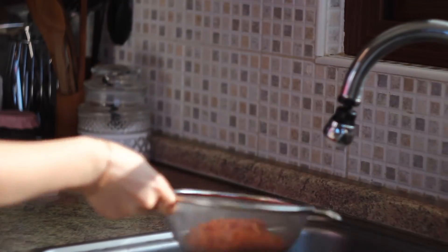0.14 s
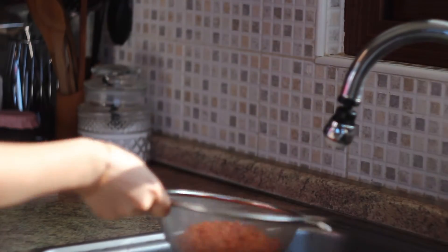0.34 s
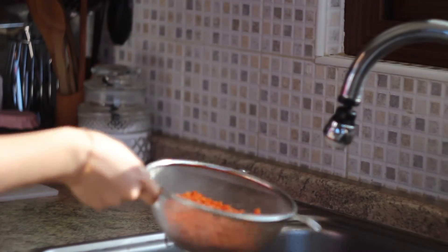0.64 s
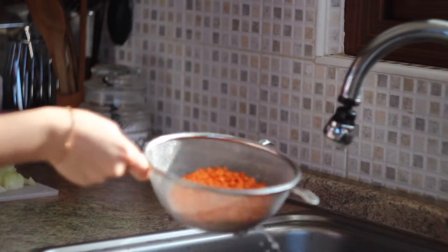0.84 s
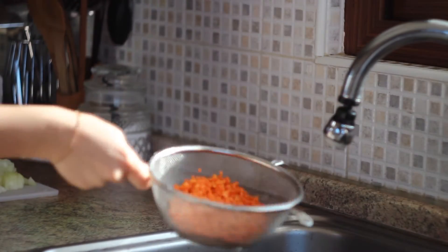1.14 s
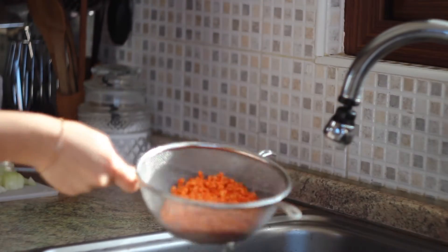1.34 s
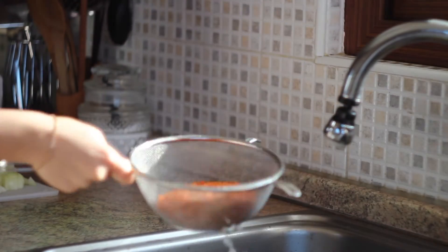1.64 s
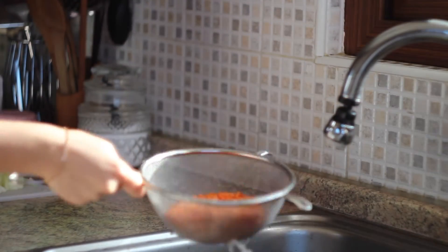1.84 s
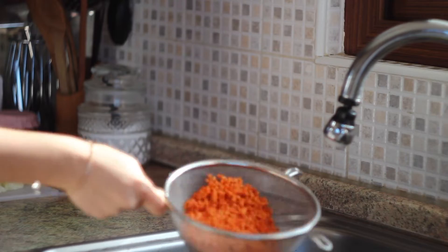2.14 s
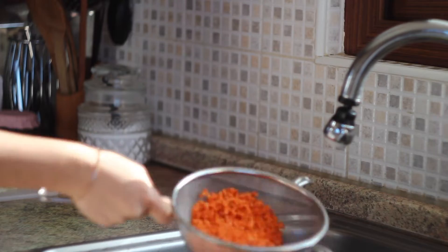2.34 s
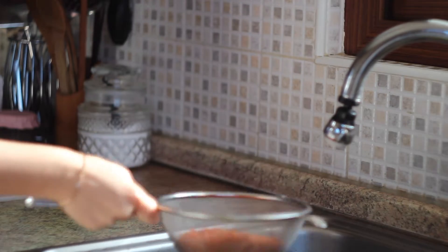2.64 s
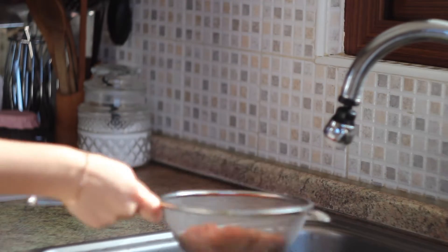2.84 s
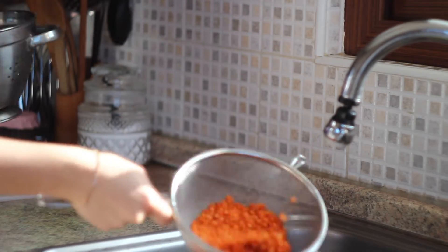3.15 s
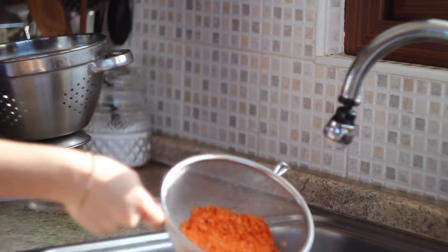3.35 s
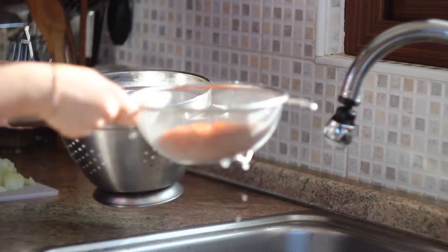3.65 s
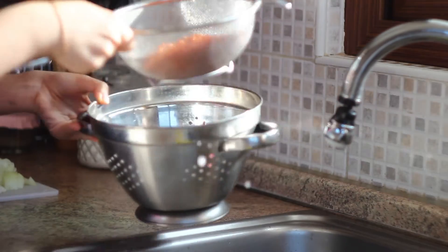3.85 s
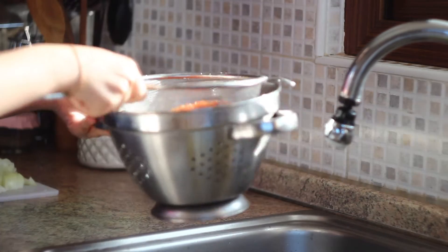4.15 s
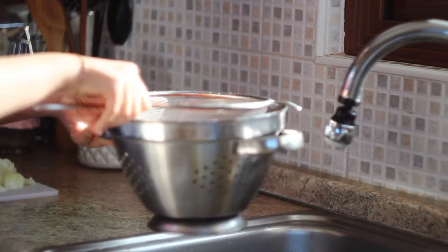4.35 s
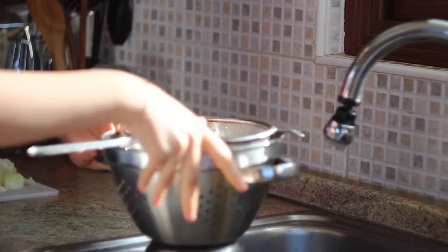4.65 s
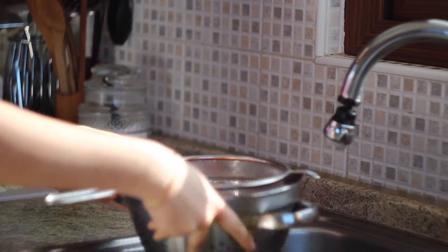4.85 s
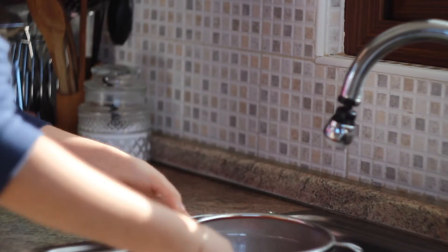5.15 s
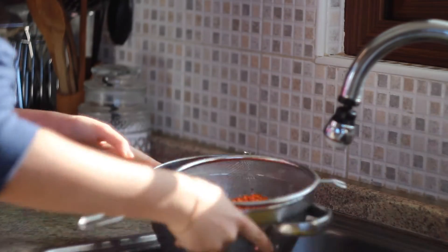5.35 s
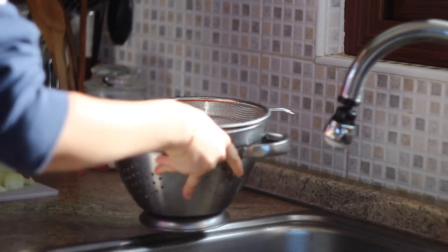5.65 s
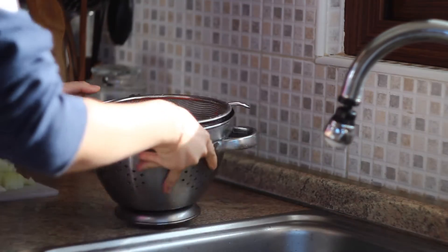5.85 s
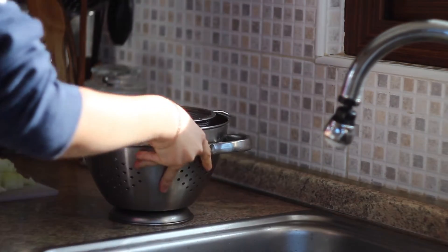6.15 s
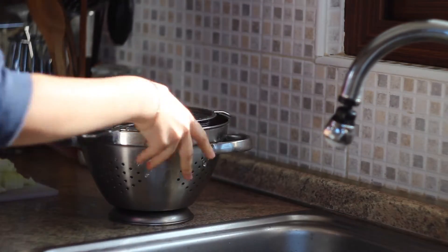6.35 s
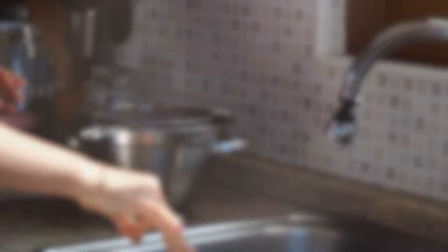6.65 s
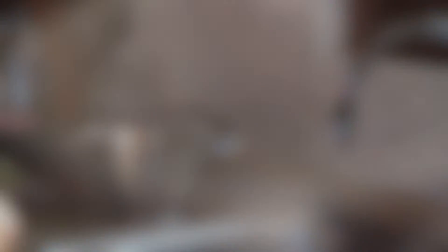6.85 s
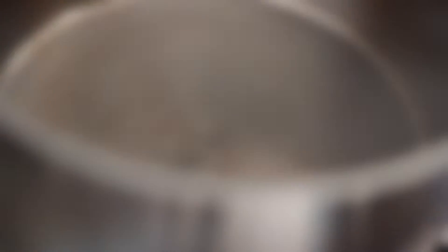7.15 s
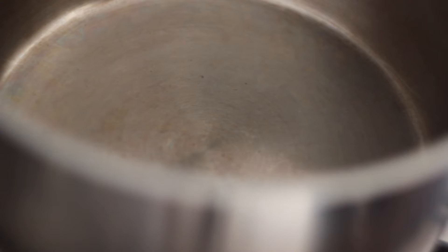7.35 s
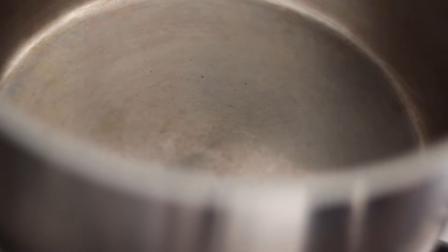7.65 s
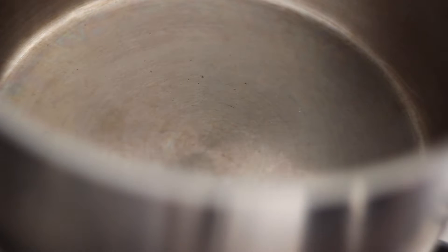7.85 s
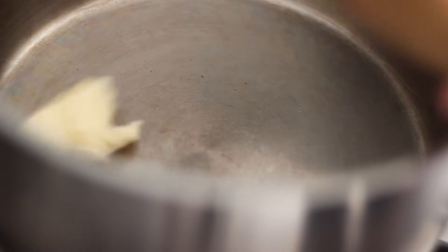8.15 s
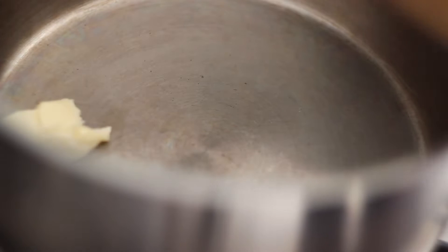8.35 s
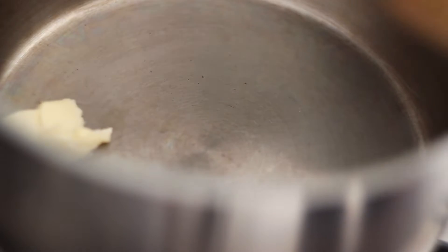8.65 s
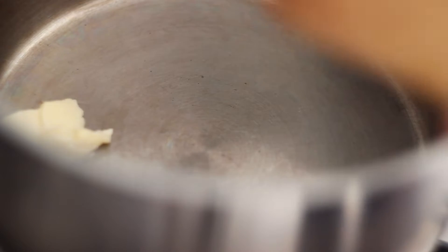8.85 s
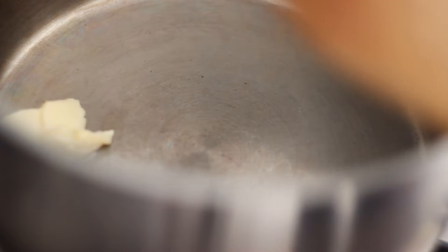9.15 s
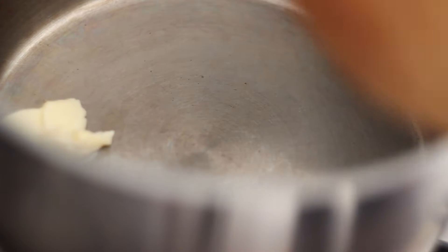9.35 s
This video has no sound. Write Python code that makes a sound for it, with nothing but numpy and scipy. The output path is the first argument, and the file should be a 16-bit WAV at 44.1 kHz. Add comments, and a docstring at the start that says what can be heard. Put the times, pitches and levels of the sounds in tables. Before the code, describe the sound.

Close to the microphone in a tiled kitchen with a steady ventilation hum, a wire strainer of wet lentils is tossed several times and shaken rapidly. It drops into a steel colander with bright, ringing clanks. The steel rubs as it is lifted, then lands ringing on the counter. The room turns quieter, and a few utensil scrapes and clicks lead to a soft bump on a pot.

```python
"""Wet lentils swish and patter close by, tossed and then shaken dry in a wire strainer over a kitchen sink.
The strainer clatters into a steel colander, wires and rim ringing; steel rubs on steel as the colander
is lifted, and its foot rings on the stone counter. The humming, tiled room then fades into a quieter
one, where utensils slide and click and a pot is bumped. All is heard as from one microphone near
the work, with the echo of the tiles well under the direct sound."""
import sys
import numpy as np
from scipy import signal
from scipy.fft import rfft, irfft, next_fast_len
from scipy.io import wavfile
from scipy.ndimage import uniform_filter1d, minimum_filter1d

SR = 44100
rng = np.random.default_rng(int(sys.argv[2]) if len(sys.argv) > 2 else 0)


def pcm_store(signal):
    """Save signal as 16-bit PCM."""
    levels = np.round(np.clip(np.atleast_2d(signal), -1, 1) * 32767)
    wavfile.write(sys.argv[1], SR, levels.astype(np.int16).T)


N = 418509
AGE = np.arange(round(.65 * SR)) / SR  # time within one event [s]
LEAD_S = .22  # from the start of a swell to its crest

# the strainer's crowd of short-lived wire modes: (frequency [Hz], density [dB])
WIRE_SPECTRUM = [(120, -44.5), (200, -38), (345, -18), (462, -28), (525, -16), (842, -12.5), (1230, -8),
                 (1540, -8), (2470, -7.5), (3360, -3.5), (3680, -7), (6130, -8.5), (15500, -17.5)]
# colander on the counter: (time [s], ring [dB], clatter over ring [dB], thump [dB])
LANDINGS = [(6.001, -22.5, 2, -39), (6.035, -30.5, 2, -50), (6.255, -66, 1, -43.5)]


def lentils(rate=9000, settle_t60=0.36, mesh_db=-9):
    """Each stroke throws wet seeds against the ringing mesh; they patter out as the heap settles."""
    # wet seeds on wire: (frequency [Hz], density [dB])
    seed_spectrum = [(530, -37), (900, -12), (1350, -2.5), (1950, -1), (2450, 0.5), (3150, -1), (4300, -3),
                     (6200, -5), (7300, -4), (9700, -15), (14300, -21.5), (15500, -34)]
    # resonances of the mesh: (frequency [Hz], level [dB])
    mesh_modes = [(1950, -8), (2650, -8), (3190, 0), (3850, -8)]
    patter, mesh_power = np.zeros(N), np.zeros(N)
    for s, db, rise, tilt_db in strokes():
        seeds = unit(grains(rate)) + amp(-7.5) * unit(grains(rate=280))  # a few wet ticks stand out
        toss = amp(db - 0.5) * swell(rise, settle_t60)
        add(patter, s - LEAD_S, toss * coloured(seeds, seed_spectrum, tilt_db, knee_hz=2300))
        push = toss * amp(mesh_db - 2 * tilt_db)  # a heap that slides dully rings the mesh most
        add(mesh_power, s - LEAD_S, push ** 2)
    mesh = resonate(rng.standard_normal(N), mesh_modes, width_hz=200)
    return patter + np.sqrt(mesh_power) * mesh


def strokes(land_rise_s=0.019, back_delay_s=.131, back_rise_s=0.028,
            shake_start_s=1.5, stroke_s=.103, stroke_rise_s=0.037, count=20):
    """Tosses, then side-to-side shaking, as (crest [s], level [dB], rise [s], tilt [dB/octave])."""
    # tosses of the heap: (landing crest [s], landing [dB], slide back [dB])
    tosses = [(.02, -44.5, -47), (.17, -44, -38.5), (.396, -33.5, -44.5), (.609, -35.5, -42.5),
              (.841, -37, -49.5), (1.065, -37, -54), (1.29, -45.5, -58)]
    # effort of the shaking: (time [s], level [dB], tilt [dB/octave])
    effort = [(1.5, -47.5, -1), (1.78, -40, -1), (2.09, -49.5, -1.5), (2.22, -40, -3), (2.53, -38, -.5),
              (2.72, -44.5, 1.5), (2.84, -40.5, -1), (3.24, -41.5, 2.5), (3.46, -50.5, 3)]
    moves = []
    for s, land_db, back_db in tosses:
        land_tilt_db = 3.5 + .15 * (land_db + 39)  # the harder the heap lands, the brighter
        moves.append((s, land_db, land_rise_s, land_tilt_db))
        moves.append((s + back_delay_s, back_db, back_rise_s, -1))  # it slides back dully
    when, level_db, tilt_db = np.transpose(effort)
    for s in shake_start_s + stroke_s * np.arange(count):
        moves.append((s, np.interp(s, when, level_db), stroke_rise_s, np.interp(s, when, tilt_db)))
    return moves


def strainer(rim_t60=0.31, frame_t60=0.19, crack_t60=0.0096, ring_db=-4):
    """Each clank is a crack, a clash of quickly dying wire modes and the ring of rim and frame."""
    # strainer against colander:
    # (time [s], level [dB], tilt [dB/octave], hardness [0-1], place [0 = frame, 1 = rim])
    clanks = [(4.236, -39, 0, 0.6, .2), (4.241, -22, -1.2, 0.06, .2), (4.268, -25.5, 1, .6, .1),
              (4.314, -17.5, 4.5, 0.3, 0.15), (4.317, -33, -16, 0.1, 0.22), (4.408, -22.5, -1, 0.25, 0.29),
              (4.52, -22.5, 18, 0.9, 0.26), (4.525, -10.5, 4.5, 0.83, 0.87), (4.806, -43.5, -2.5, 0.03, 1),
              (5.262, -29.5, -1, 0.8, .55), (5.367, -31, -4.5, .2, 0.13), (5.912, -34, 4.5, 0.1, .2),
              (6.187, -35.5, 1, 0.43, .1)]
    # lasting modes of the steel rim: (frequency [Hz], level [dB])
    rim_modes = [(831, -14.8), (1528, -13.5), (1812, -14.6), (2182, -14.0), (3028, -10.2), (3080, -8.5),
                 (3230, -7.8), (3314, 0.0), (3410, -3.5), (3463, -2.0), (4599, -12.0), (5357, -8.6),
                 (5420, -11.2), (5484, -6.6), (5709, -10.5), (5934, -5.7), (6098, -4.1), (6322, -11.6),
                 (7106, -11.8), (7670, -12.1), (7736, -8.3), (7828, -8.7), (9417, -10.9), (9540, -12.5)]
    # modes of the wire frame: (frequency [Hz], level [dB])
    frame_modes = [(709, -3.9), (861, -1.3), (918, -2.2), (1554, -0.8), (1847, -2.3), (2339, -2.1),
                   (2794, -0.7), (2839, 0.0), (3931, -1.9), (4122, -0.2), (4982, -0.6), (5522, -0.9),
                   (7050, -1.6), (8408, -1.9)]
    out = np.zeros(N)
    for s, db, tilt_db, hardness, place in clanks:
        # a harder blow cracks more and clashes for less time
        crack_db = np.interp(hardness, (0, 1), (-13, 9.5))
        clash_t60 = np.exp(np.interp(hardness, (0, 1), np.log((0.45, 0.095))))
        envelope = decay(clash_t60) + amp(crack_db) * decay(crack_t60)
        clash = coloured(rng.standard_normal(len(AGE)), WIRE_SPECTRUM, tilt_db) * envelope
        rim = ring(rim_modes, rim_t60, blur_hz=24, damping=0.27)
        frame = ring(frame_modes, frame_t60, blur_hz=11.3)
        ringing = amp(ring_db) * (place * rim + (1 - place) * frame)
        add(out, s, amp(db + 1.5) * (clash + ringing))
    return thin(out, corner_hz=344)


def rubbing(rate=12000, rub_t60=0.17, purity=0.6):
    """Steel rasps on steel and the bowl sings along, on fewer modes the smoother the rub."""
    # the strainer shifts in the lifted colander: (crest [s], level [dB], rise [s], rasp [dB])
    rubs = [(5.255, -46.5, 0.07, 2.5), (5.285, -29, 0.021, -0.5), (5.328, -29, 0.011, -4),
            (5.385, -40, 0.034, 11), (5.936, -28, 0.01, -6), (5.975, -28, 0.028, -12)]
    # modes of the rubbed bowl: (frequency [Hz], level [dB])
    bowl_modes = [(716, -11.0), (821, -10.7), (1499, 0.0), (1589, -4.9), (1800, -7.7), (2769, -3.6),
                  (2900, -8.3), (3411, -7.3), (4248, -9.6), (4649, -7.6)]
    out = np.zeros(N)
    for s, db, rise, rasp_db in rubs:
        modes = [(hz, level + purity * rasp_db * min(abs(hz - 1520) / 700, 2))
                 for hz, level in bowl_modes]
        sing = resonate(grains(rate), modes, width_hz=24)
        rasp = amp(rasp_db) * coloured(grains(rate), WIRE_SPECTRUM, tilt_db=-1.0)
        add(out, s - LEAD_S, amp(db - 2.5) * swell(rise, rub_t60) * (sing + rasp))
    return thin(out, corner_hz=298)


def colander(foot_t60=0.33, clatter_t60=0.4, crack_t60=0.011):
    """The steel foot lands on the stone counter, rocks and rings."""
    # modes of the foot: (frequency [Hz], level [dB])
    foot_modes = [(988, -3.1), (1557, -15.0), (1694, -16.7), (1820, -7.5), (1961, -13.3), (2047, 0.0),
                  (2739, -15.3), (2852, -13.1), (3018, -8.9), (3172, -11.0), (4121, -12.5), (4267, -13.8),
                  (4372, -14.0), (4745, -18.8), (4957, -18.0), (5828, -19.1), (5957, -18.4), (6014, -20.0)]
    # steel clattering on stone: (frequency [Hz], density [dB])
    clatter_spectrum = [(240, -56), (400, -35), (438, -26), (772, -19.5), (987, 0), (1240, -16),
                        (2030, 1.5), (2250, -29), (2920, -4.5), (3850, -19), (4290, -8), (5480, -23),
                        (5910, -13), (6780, -25.5), (15500, -38)]
    out = np.zeros(N)
    for s, db, clatter_db, _ in LANDINGS:
        clatter = coloured(rng.standard_normal(len(AGE)), clatter_spectrum) * decay(clatter_t60)
        crack = amp(5.5) * band(4400, 0.56) * decay(crack_t60)
        foot = ring(foot_modes, foot_t60, blur_hz=4.8, damping=-0.062)
        add(out, s, amp(db) * (foot + amp(clatter_db) * (clatter + crack)))
    return thin(out, corner_hz=260)


def utensil(rate=16000):
    """A sliding utensil rasps in fine grains that ring it; a quicker stroke stops sooner."""
    # its strokes: (crest [s], level [dB], rise [s], tilt [dB/octave])
    slides = [(6.782, -44.5, 0.022, -8), (6.815, -39, 0.014, -1.5), (6.832, -32, 0.013, -1.5),
              (6.844, -29, 0.0054, -1), (7.801, -49, 0.072, 12.5), (7.99, -47, 0.044, 11)]
    # its broad resonances: (frequency [Hz], level [dB])
    resonances = [(520, -6), (1050, -2.5), (2100, 2.5), (2520, 9), (2800, -1), (4700, 3.5), (5250, -9),
                  (7650, -7), (10700, -12), (14500, -16)]
    out = np.zeros(N)
    for s, db, rise, tilt_db in slides:
        modes = [(hz, level + tilt_db * np.log2(hz)) for hz, level in resonances]
        rasp = resonate(grains(rate), modes, width_hz=400)
        add(out, s - LEAD_S, amp(db) * swell(rise, t60=4 * rise) * rasp)
    return out


def knocks(click_t60=0.012, echo_t60=0.43, bump_s=8.144):
    """Small sounds around the sink: thuds, clicks, spits, the counter's thump and the bumped pot."""
    # dull thuds in the sink and on the counter: (time [s], level [dB], pitch [Hz], t60 [s])
    thuds = [(1.506, -46, 237, 0.14), (1.545, -40, 330, .1), (1.595, -37, 206, 0.16), (1.941, -48, 354, .4),
             (4.124, -45, 305, .28), (6.81, -45, 483, .1), (6.833, -38.5, 515, 0.09),
             (7.147, -43, 480, 0.044)]
    # light clicks of kitchenware: (time [s], level [dB], centre [Hz], room echo over click [dB])
    clicks = [(1.0, -39, 3360, -9), (6.442, -30, 4600, -12), (6.81, -36.5, 3000, -12),
              (6.99, -36.5, 1590, -10.5), (7.579, -49, 1200, -3.5), (7.649, -45.5, 700, -10),
              (8.001, -29, 4600, -34)]
    # thin spits of the wet mesh: (time [s], level [dB])
    spits = [(1.62, -45), (3.165, -41)]
    out = np.zeros(N)
    for s, db, hz, t60 in thuds:
        add(out, s, amp(db) * band(hz, octaves=0.18) * decay(t60))
    for s, db, hz, echo_db in clicks:
        envelope = decay(click_t60) + amp(echo_db) * decay(echo_t60)
        add(out, s, amp(db) * band(hz, octaves=1.22) * envelope)
    for s, db in spits:
        add(out, s, amp(db) * band(13000, octaves=.38) * decay(0.11))
    for s, _, _, thump_db in LANDINGS:
        add(out, s, amp(thump_db) * band(290, octaves=2.1) * decay(0.69))
    add(out, bump_s, pot())
    return thin(out, corner_hz=100)


def pot():
    """A soft bump sets off a tick, a low boom and a short ring."""
    # the pot's three modes: (frequency [Hz], level [dB])
    modes = [(470, -4.5), (1365, -2.5), (2860, -6.5)]
    tick = amp(-45) * band(2100, octaves=1.5) * decay(.015)
    boom = amp(-48.5) * band(230, octaves=0.89) * decay(0.46)
    return tick + boom + amp(-44.5) * ring(modes, t60=0.12, blur_hz=8.5, damping=0.97)


def tiles(x, delay_s=.006):
    """The tiled room's echo: each frequency dies at its own speed."""
    # reverberation time: (frequency [Hz], t60 [s])
    t60s = [(150, 0.41), (1000, 0.77), (3500, 0.77), (8000, 0.7), (15000, 0.32)]
    hz, t, spectra = signal.stft(rng.standard_normal(SR), SR, nperseg=256)
    dying = np.exp(-np.log(1000) * t / along(t60s, hz)[:, None])
    tail = signal.istft(spectra * dying, SR, nperseg=256)[1]
    tail = np.pad(tail / np.linalg.norm(tail), (round(delay_s * SR), 0))
    return signal.fftconvolve(x, tail)[:N]


def room_tone(kitchen_db=-49.5, stove_db=-53.5, fade_start_s=6.43, fade_s=0.9):
    """Behind it all, ventilation and appliance hum give way to a thinner hiss."""
    # ventilation heard at the sink: (frequency [Hz], density [dB])
    kitchen_air = [(15, -42), (25, -20), (53, -21), (113, -21), (140, -5), (169, -7.5), (421, 1),
                   (919, -2.5), (1020, -6), (1340, -7), (1800, -9), (3530, -16.5), (5730, -17.5),
                   (7500, -22.5), (15500, -22.5)]
    # the quieter room, by the stove: (frequency [Hz], density [dB])
    stove_air = [(15, -24), (64, -12.5), (116, -3.5), (200, -8.5), (400, -2.5), (826, -6), (1300, -5.5),
                 (1530, -8.5), (1950, -5), (2560, -10.5), (4000, -12.5), (5700, -12.5), (9050, -19),
                 (15500, -16.5)]
    # appliance tones: (frequency [Hz], relative level [dB])
    tones = [(48.5, -72), (344.5, -66.5), (1028, -69.5)]
    t = np.arange(N) / SR
    fade = np.pi / 2 * np.clip((t - fade_start_s) / fade_s, 0, 1)
    hum = sum(amp(db + 54) * np.sqrt(2) * np.sin(2 * np.pi * (hz * t + rng.random()))
              for hz, db in tones)
    whine = amp(-18.5) * resonate(rng.standard_normal(N), [(5790, 0)], width_hz=300)
    kitchen = coloured(rng.standard_normal(N), kitchen_air) + hum + whine
    stove = coloured(rng.standard_normal(N), stove_air)
    return amp(kitchen_db) * np.cos(fade) * kitchen + amp(stove_db) * np.sin(fade) * stove


def ring(modes, t60, blur_hz, damping=0.13, scatter_db=1.0):
    """Damped modes, t60 given at 3 kHz; loose contact makes their phases wander, blurring the lines."""
    hz, db = np.transpose(modes)
    gains = amp(db + scatter_db * rng.standard_normal(len(db)))
    knots = AGE[::SR // 1000]
    out = np.zeros(len(AGE))
    for f, gain in zip(hz, gains / np.linalg.norm(gains)):
        wander = np.cumsum(rng.standard_normal(len(knots))) * np.sqrt(2 * np.pi * blur_hz * knots[1])
        phase = 2 * np.pi * (f * AGE + rng.random()) + np.interp(AGE, knots, wander)
        out += gain * np.sin(phase) * decay(t60 * (3000 / f) ** damping)
    return np.sqrt(2) * out


def resonate(x, modes, width_hz):
    """x rings modes of (frequency [Hz], level [dB]); rms 1."""
    def response(f):
        return sum(amp(db) * 1j * f * width_hz / (hz ** 2 - f ** 2 + 1j * f * width_hz)
                   for hz, db in modes)
    return unit(filtered(x, response))


def grains(rate):
    """Tiny contacts of random size, rate a second."""
    return np.sqrt(rng.poisson(rate / SR, len(AGE))) * rng.standard_normal(len(AGE))


def band(centre_hz, octaves):
    """Noise in a bell-shaped band; rms 1."""
    noise = rng.standard_normal(len(AGE))
    return unit(filtered(noise, lambda hz: np.exp(-.5 * (np.log2((hz + 1) / centre_hz) / octaves) ** 2)))


def coloured(x, spectrum, tilt_db=0, knee_hz=500):
    """x shaped by a spectrum and tilted above the knee by tilt_db per octave; rms 1."""
    def response(hz):
        return amp(along(spectrum, hz) + tilt_db * np.log2(np.maximum(hz / knee_hz, 1)))
    return unit(filtered(x, response))


def thin(x, corner_hz):
    """Thin sheet metal radiates little bass."""
    return signal.sosfilt(signal.butter(3, corner_hz, "highpass", fs=SR, output="sos"), x)


def decay(t60):
    """A fall of 60 dB every t60 seconds."""
    return np.exp(-np.log(1000) * AGE / t60)


def swell(rise, t60):
    """A rounded rise to the crest, then an exponential fall."""
    t = AGE - LEAD_S
    return np.exp(np.where(t < 0, -(t / rise) ** 2, -np.log(1000) * t / t60))


def filtered(x, response):
    """x through a frequency response."""
    size = next_fast_len(len(x) + 8192)
    return irfft(rfft(x, size) * response(np.fft.rfftfreq(size, 1 / SR)), size)[:len(x)]


def along(points, hz):
    """Interpolate (frequency [Hz], value) points on a log axis."""
    freqs, values = np.transpose(points)
    return np.interp(np.log(hz + 1), np.log(freqs + 1), values)


def add(out, s, x):
    """Mix x into out from time s."""
    i = round(s * SR)
    x, i = x[max(-i, 0):], max(i, 0)
    out[i:i + len(x)] += x[:len(out) - i]


def amp(db):
    return 10 ** (np.asarray(db) / 20)


def unit(x):
    return x / np.sqrt(np.mean(x ** 2) + 1e-20)


def scene():
    """At the microphone: the near sources, their echo off the tiles and the room tone, in mono."""
    seeds, steel = lentils(), strainer() + rubbing()
    foot, slides, small = colander(), utensil(), knocks()
    echo = tiles(amp(-6.5) * seeds + amp(-8) * steel + amp(-9) * (foot + slides) + amp(-14) * small)
    return (seeds + steel + foot + slides + small + echo + room_tone())[None]


def record(dry, ceiling=.98, top_hz=15950):
    """A fast limiter holds the peaks under full scale; a steep low-pass cuts the highest treble."""
    needed = 1 / np.maximum(np.abs(dry[0]) / ceiling, 1)
    gain = uniform_filter1d(minimum_filter1d(needed, size=45), size=45)
    return filtered(dry[0] * gain, lambda hz: 1 / np.sqrt(1 + (hz / top_hz) ** 200))[None]


dry = scene()
out = record(dry)
pcm_store(out)
```